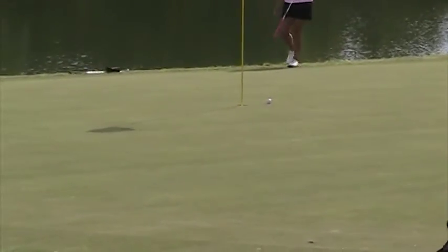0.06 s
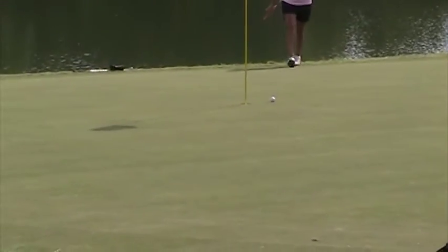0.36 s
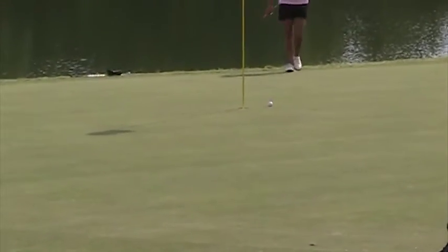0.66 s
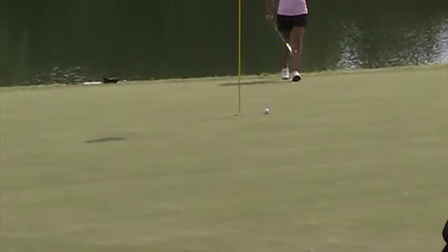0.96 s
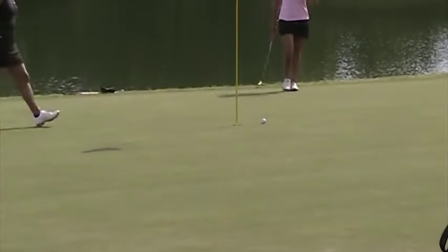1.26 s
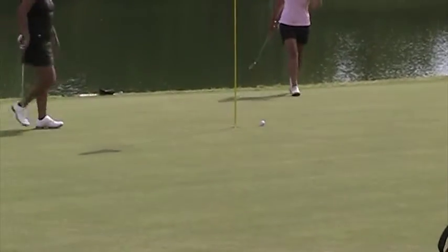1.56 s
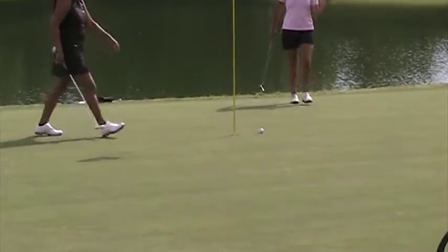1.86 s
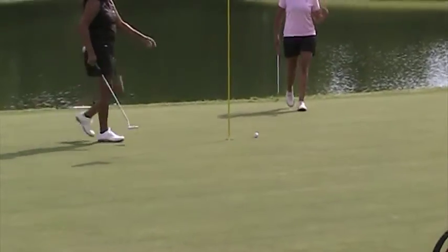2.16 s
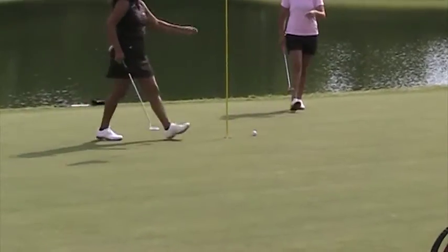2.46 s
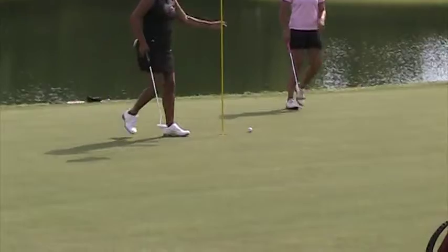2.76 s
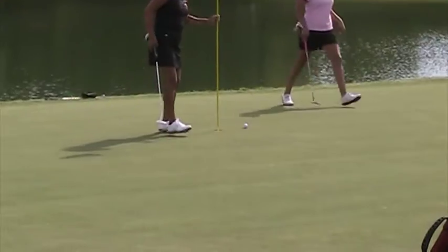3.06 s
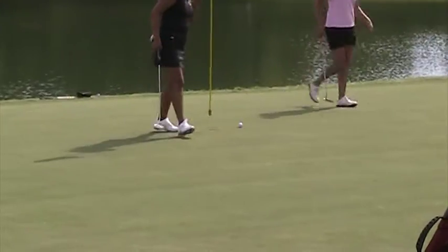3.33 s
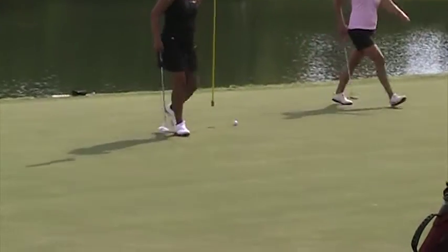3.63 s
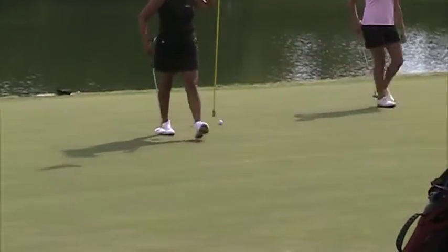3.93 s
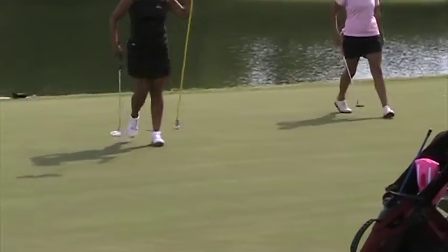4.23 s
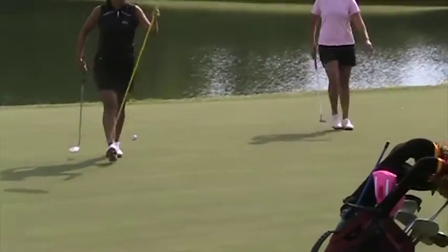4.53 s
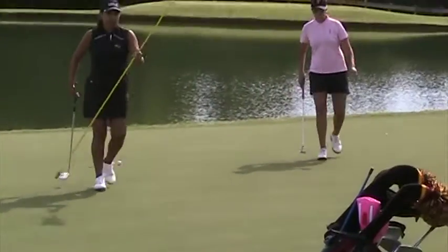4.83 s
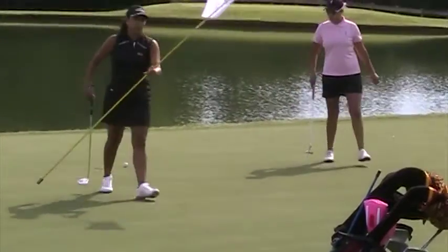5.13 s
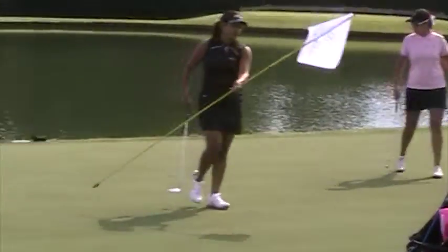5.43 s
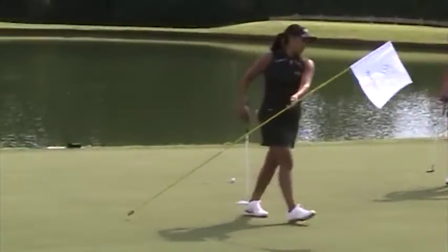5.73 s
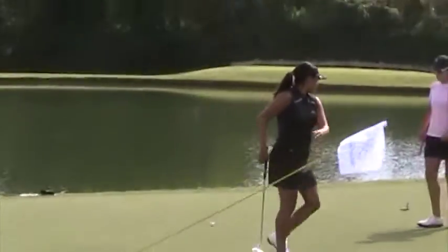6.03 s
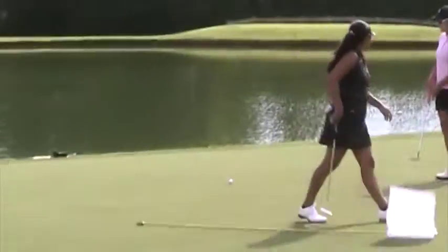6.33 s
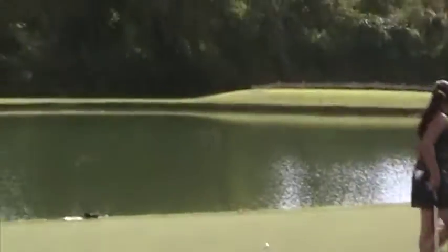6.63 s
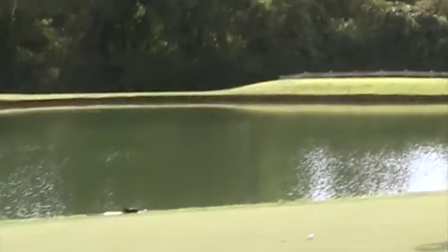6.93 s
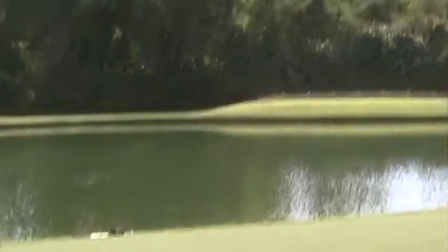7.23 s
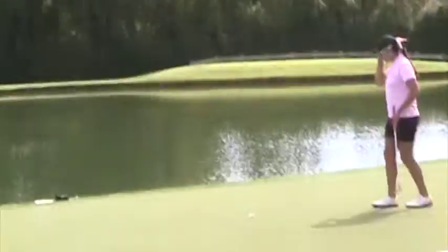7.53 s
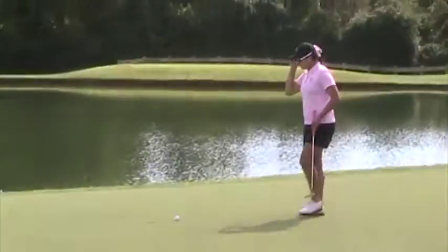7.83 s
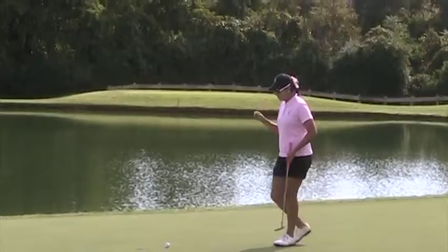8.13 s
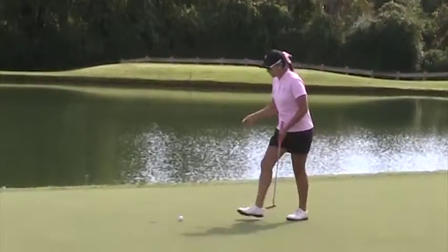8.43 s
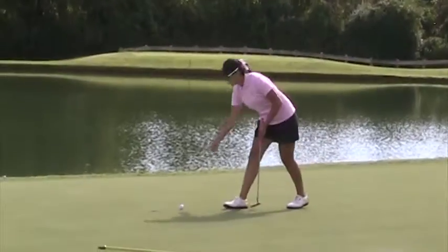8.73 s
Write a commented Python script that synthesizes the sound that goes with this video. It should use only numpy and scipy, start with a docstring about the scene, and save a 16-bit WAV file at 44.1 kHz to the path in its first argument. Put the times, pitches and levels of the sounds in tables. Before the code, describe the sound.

A quiet outdoor background runs throughout: low wind rumble, a distant hum, faint high insect trills and scattered chips and thin whistles from small birds. The end of a hawk's scream is heard right at the start. From about 2.2 seconds the hawk calls steadily, roughly twice a second, until the end. Each scream is short, shrill and arched, hoarse at first and later shorter and purer, with a faint echo from the trees. Soft low wind bumps touch the microphone, mostly around 3.7 and 5.9 seconds. Two faint knocks come near 5.8 seconds. At about 6.3 seconds a dropped flagstick lands close by, slightly left, with a sharp clack and brief rattle, by far the loudest sound, and bounces once at 6.5 seconds among light knocks. Two more small, dry knocks follow around 7.7 and 7.9 seconds as the hawk continues.

```python
"""A hawk repeats its arched scream from the trees by a golf green, over insects and small birds.
Its syrinx doubles its period into side tones and breaks up hoarsely. A dropped flagstick clacks,
rattles and bounces once, among a few light, close knocks. A breeze hums in the distance and now and
then its eddies bump the microphone. The tree line scatters back a faint tail."""
import sys
import numpy as np
from scipy import signal
from scipy.fft import rfft, irfft, next_fast_len
from scipy.io import wavfile
from scipy.ndimage import uniform_filter1d, map_coordinates

SR = 44100
rng = np.random.default_rng(int(sys.argv[2]) if len(sys.argv) > 2 else 0)


def unload_audio(sound):
    """Save the sound as a 16-bit wav file, at the path given as the first command line argument."""
    columns = np.transpose(np.atleast_2d(sound))
    # keep every value between -1 and 1, then stretch to whole-number steps
    steps = np.round(np.clip(columns, -1, 1) * 32767)
    wavfile.write(sys.argv[1], SR, steps.astype(np.int16))


N = 387198


def amp(db):
    return 10 ** (np.asarray(db) / 20)


def unit_rms(x):
    return x / np.sqrt(np.mean(x ** 2) + 1e-20)


def at_hz(points, hz):
    """Interpolate (Hz, value) points on a log axis."""
    knots_hz, values = np.transpose(points)
    return np.interp(np.log(hz + 1), np.log(knots_hz + 1), values)


def timeline(points):
    """Interpolate (s, value) points at every sample."""
    return np.interp(np.arange(N) / SR, *np.transpose(points))


def bell(t, centre, width):
    return np.exp(-((t - centre) / width) ** 2)


def wobble(rate, size=N):
    """Smooth random curve, rate knots per second."""
    knots = rng.standard_normal(int(size * rate / SR) + 4)
    return map_coordinates(knots, [np.arange(size) * rate / SR], mode="nearest")


def filtered(x, response):
    """Apply a gain given as a function of Hz."""
    n = x.shape[-1]
    padded = next_fast_len(n + 4096)
    return irfft(rfft(x, padded) * response(np.fft.rfftfreq(padded, 1 / SR)), padded)[..., :n]


def add(track, start_s, sound):
    i = round(start_s * SR)
    part = sound[max(-i, 0):N - i]
    track[max(i, 0):][:len(part)] += part


def band(centre_hz, octaves, size):
    """Noise of rms 1 in one bell-shaped band."""
    response = lambda f: np.exp(-.5 * (np.log2((f + 1) / centre_hz) / octaves) ** 2)
    return unit_rms(filtered(rng.standard_normal(size), response))


def tinted(x, spectrum):
    """Shape x by (Hz, dB) points, at rms 1."""
    return unit_rms(filtered(x, lambda f: amp(at_hz(spectrum, f))))


def burst(envelope, spectrum):
    """Noise burst, flattened before it takes on a spectrum."""
    n = len(envelope)
    phases = np.angle(rfft(rng.standard_normal(n) * envelope, 2 * n))
    flat = irfft(np.exp(1j * phases))[:n]
    return tinted(flat, spectrum) * np.sqrt(np.mean(envelope ** 2))


def panned(x, pan_db, lag_s):
    """Stereo pair, the left side pan_db louder and lag_s later."""
    sides = np.array([[.5], [-.5]])
    return filtered(x, lambda f: amp(pan_db * sides) * np.exp(-2j * np.pi * f * lag_s * sides))


# Stereo width of the ambience. Each row: frequency in Hz, left-right correlation.
CORRELATION = [(40, -0.62), (80, 0.087), (130, 0.73), (250, 0.15), (500, 0.38), (1000, 0.37), (3000, -0.4),
               (8000, -0.04), (14000, -0.36)]

def rush(spectrum, patchy_db):
    """Stereo noise with patches of random gain; the mid signal has rms 1."""
    cells = signal.stft(rng.standard_normal((2, N)), nperseg=512)[2]
    patches = uniform_filter1d(rng.standard_normal(cells.shape[1:]), size=5, axis=0)
    patches = unit_rms(uniform_filter1d(patches, size=14, axis=1))
    pair = signal.istft(cells * amp(patchy_db * patches), nperseg=512)[1][:, :N]
    angle = lambda f: np.arccos(at_hz(CORRELATION, f)) / 2
    mid, side = filtered(pair, lambda f: amp(at_hz(spectrum, f)) * [np.cos(angle(f)), np.sin(angle(f))])
    return np.array([mid + side, mid - side]) / np.std(mid)


# Decay among the trees. Each row: frequency in Hz, t60 in seconds.
TREE_DECAY = [(150, 0.3), (800, 0.22), (3300, 2.35), (8000, 0.64), (14000, 0.06)]

def tree_echo(x, correlation):
    """The tree line scatters back a long stereo tail."""
    hz, t, cells = signal.stft(rng.standard_normal((2, SR)), SR, nperseg=256)
    envelope = amp(-60 * t / at_hz(TREE_DECAY, hz)[:, None]) * (1 - np.exp(-t / .018))
    tail = signal.istft(cells * envelope, SR, nperseg=256)[1]
    mid, side = signal.fftconvolve(x[None], tail / np.linalg.norm(tail[0]), axes=1)[:, :N]
    angle = np.arccos(correlation) / 2
    return np.cos(angle) * mid + np.sin(angle) * np.array([side, -side])


# Wind rumble and far hum spectra. Each row: frequency in Hz, relative density in dB.
RUMBLE_SPECTRUM = [(12, -13), (20, -7), (38, 7.5), (65, 2), (113, -2.5), (136, -7), (231, -7), (260, -20),
                   (320, -15), (420, -50), (700, -120)]
HUM_SPECTRUM = [(60, -37), (90, -2.5), (120, -1.5), (170, -4), (230, -3.5), (300, -8), (400, -9.5),
                (500, -9.5), (700, -7), (850, -11), (1050, -14), (1400, -16.5), (2200, -24.5), (4000, -40)]
# Their strength over time. Each row: time in seconds, relative level in dB.
RUMBLE_LEVELS = [(0.0, -48), (0.8, -50), (1.15, -50), (2.81, -50.5), (3.25, -55), (3.74, -46), (4.35, -54),
                 (5.45, -54), (5.87, -50), (6.09, -51.5), (6.77, -55.5), (7.39, -55), (8.78, -55.5)]
HUM_LEVELS = [(0.0, -49.5), (3.47, -50), (4.28, -49), (5.26, -50), (6.36, -47.5), (6.5, -45.5),
              (7.65, -50.5), (8.26, -49), (8.78, -50.5)]

def breeze(gust_db=1.4):
    """Wind rumbles in gusts and hums in the distance."""
    rumble_db = timeline(RUMBLE_LEVELS) + .5 + gust_db * wobble(9.9)
    rumble = amp(rumble_db) * rush(RUMBLE_SPECTRUM, patchy_db=1.5)
    hum = amp(timeline(HUM_LEVELS) + 1) * rush(HUM_SPECTRUM, patchy_db=1.03)
    return rumble + hum


def far_swell(peak_s=1.22, width_s=.24, level_db=-57.5):
    """A soft, narrow rush swells once out of the distant hum."""
    return amp(level_db) * bell(np.arange(N) / SR, peak_s, width_s) * band(1100, .22, N)


# Wind eddies. Each row: peak time in seconds, relative level in dB, frequency in Hz.
EDDIES = [(1.365, -38, 58), (1.975, -34.5, 47.7), (2.045, -38, 44.7), (3.148, -36.5, 62),
          (3.625, -29, 55.5), (3.688, -40, 84), (3.768, -28.5, 49.4), (3.821, -36, 45.8), (5.686, -36, 59),
          (5.845, -28, 55), (5.889, -35, 80), (5.924, -28.5, 71), (6.315, -35.5, 112), (8.46, -42, 124)]

def eddy_bumps(width_cycles=.87, gain_db=7.5):
    """Each eddy swings briefly, pushing the two microphone ports mostly in opposite ways."""
    out = np.zeros((2, N))
    for peak_s, db, hz in EDDIES:
        width_s = width_cycles / hz
        reach = int(3 * width_s * SR)
        t = np.arange(-reach, reach) / SR
        phase = 2 * np.pi * hz * np.cumsum(1 + .42 * wobble(89, len(t))) / SR
        for port, offset_rad in zip(out, (0, 2.3)):
            add(port, peak_s + t[0], amp(db + gain_db) * bell(t, 0, width_s) * np.sin(phase + offset_rad))
    return out


def trill(hz, stroke_hz, spread, sharpness, hold_s, fade_db_per_s):
    """Near-regular wing strokes, each a scratchy tone; the level holds, then fades."""
    strokes = np.cumsum(stroke_hz * (1 + .032 * wobble(1.72))) / SR
    tone = np.sin(2 * np.pi * np.cumsum(hz * (1 + spread * wobble(700))) / SR)
    fade = amp(-fade_db_per_s * np.maximum(np.arange(N) / SR - hold_s, 0))
    return fade * unit_rms(tone * np.abs(np.sin(np.pi * strokes)) ** sharpness)


# Far insects and leaves. Each row: frequency in Hz, relative density in dB.
CHORUS_SPECTRUM = [(1200, -16), (2100, 2), (3300, 2), (4500, -1.5), (5500, -2), (6500, 0), (7100, 1.5),
                   (7800, 5.5), (8600, -2), (10000, -10.5), (13000, -19), (15700, -28)]

def insects():
    """Two near trills stand out of a far chorus, then sink back into it."""
    slow = trill(hz=6340, stroke_hz=17.8, spread=.02, sharpness=4.9, hold_s=2, fade_db_per_s=1.5)
    fast = trill(hz=7620, stroke_hz=27, spread=.013, sharpness=2.6, hold_s=6.7, fade_db_per_s=11)
    chorus = amp(-59 + .78 * wobble(1.7)) * rush(CHORUS_SPECTRUM, patchy_db=2.5)
    return amp(-69.5) * slow + amp(-68.5) * fast + chorus


def bird_note(length_s, first_hz, last_hz, waver, bend):
    """A wavering tone that slides fast, then settles."""
    progress = np.linspace(0, 1, int(length_s * SR))
    pitch_hz = last_hz + (first_hz - last_hz) * (1 - progress) ** bend
    pitch_hz *= 1 + waver * wobble(1280, len(progress))
    swell = np.abs(np.sin(np.pi * progress)) ** .5 * amp(1.8 * wobble(65, len(progress)))
    return swell * np.sin(2 * np.pi * np.cumsum(pitch_hz) / SR)


# Chips. Each row: start in seconds, level in dB.
BIRD_CHIPS = [(1.785, -47.5), (2.935, -43.5), (3.359, -48), (4.715, -49), (5.667, -49), (6.56, -47),
              (7.82, -56), (8.565, -56)]
# Whistles. Each row: start and length in seconds, first and last pitch in Hz, level in dB.
BIRD_WHISTLES = [(.91, 0.13, 2560, 2260, -64), (1.075, 0.12, 2090, 2370, -60.5),
                 (1.16, 0.087, 4900, 5020, -66), (1.395, .11, 2580, 2410, -64),
                 (1.525, 0.09, 2100, 2360, -67), (2.1, 0.075, 2470, 2360, -62),
                 (4.73, .14, 9600, 8550, -65), (4.935, .17, 8940, 8150, -54),
                 (5.074, 0.12, 2360, 2380, -66)]

def songbirds():
    """Quick, buzzy rising chips and thin slurred whistles."""
    out = np.zeros(N)
    for start_s, db in BIRD_CHIPS:
        chip = bird_note(length_s=.028, first_hz=4900, last_hz=7600, waver=.055, bend=2.3)
        add(out, start_s, amp(db) * chip)
    for start_s, length_s, first_hz, last_hz, db in BIRD_WHISTLES:
        add(out, start_s, amp(db) * bird_note(length_s, first_hz, last_hz, waver=.0043, bend=3))
    return out


# Knocks, scuffs and the flagstick's settling taps. Each row: start in seconds, level in dB,
# centre in Hz, width in octaves, t60 in seconds, relative tick level in dB.
LIGHT_KNOCKS = [(5.817, -41.5, 2300, .7, .1, -18), (5.869, -47, 2300, .7, .12, -20),
                (6.3745, -24.5, 2000, 1, .02, -12), (6.404, -26, 900, .9, .035, -25),
                (6.463, -38, 2000, .7, .02, -20), (7.145, -54, 1900, 1, .4, -12),
                (7.7353, -34, 2200, .35, .012, -3), (7.8902, -37, 1750, .45, .016, -30)]

def knocks():
    """Short dry knocks, some with a bright tick."""
    out, t = np.zeros(N), np.arange(SR // 3) / SR
    for start_s, db, hz, octaves, t60_s, tick_db in LIGHT_KNOCKS:
        tick = amp(tick_db - 60 * t / .009) * band(11300, .17, len(t))
        body = amp(-60 * t / t60_s) * band(hz, octaves, len(t))
        add(out, start_s, amp(db) * (body + tick))
    return out


def bending_ping(t, arrival_s=.0039, arrival_hz=8800, return_s=.00817):
    """A bending wave runs down the pole, highs first: speed goes as root frequency, pitch as 1 / t^2."""
    sweep = np.sin(2 * np.pi * arrival_hz * arrival_s ** 2 / (t + 1e-5))
    envelope = bell(t, arrival_s, .00025) + .5 * bell(t, .005, .0011) + .52 * bell(t, return_s, .0008)
    return envelope * sweep


# Pole rattle. Each row: frequency in Hz, relative density in dB.
RATTLE_SPECTRUM = [(120, -24), (250, -4), (500, -11), (900, -2.5), (2000, -4), (4000, -8), (5000, -12.5),
                   (8300, -17), (12000, -29), (16000, -33)]

def pole_rattle(t, tap_hz=170, tap_decay_db=18, t60_s=.35):
    """The quivering pole taps at an uneven rate, each tap dying before the next."""
    taps = np.cumsum(tap_hz * np.exp(.5 * wobble(120, len(t)))) / SR
    noise = rng.standard_normal(len(t))
    tap_db = 1.44 * np.clip(wobble(150, len(t)), -1, 1) - tap_decay_db * (taps % 1)
    chatter = tinted(noise * amp(tap_db), RATTLE_SPECTRUM)
    return amp(-60 * t / t60_s) * (1 - np.exp(-t / .0044)) * chatter


# Contact crack. Each row: frequency in Hz, relative density in dB.
CRACK_SPECTRUM = [(60, -35), (130, -5), (300, 2), (500, 3), (800, 1), (1300, -9), (2000, 0.5), (3000, -4),
                  (3900, 0.5), (4900, -15), (6200, -7), (9000, -5), (12500, -16.5), (16000, -27)]
# Low pole modes. Each row: frequency in Hz, relative level in dB, t60 in seconds.
POLE_MODES = [(183, -7.5, 0.034), (285, -1, 0.028), (487, 0, 0.02), (723, 2, 0.019)]
# Fall and bounce. Each row: start in seconds, level in dB, relative thud, ping and rattle levels in dB.
POLE_BLOWS = [(6.3425, -6, -7.5, -2.5, -20), (6.5245, -19, 4, 2.5, -19)]

def flagstick(lead_s=.00192, smack_hz=1900):
    """A soft first touch thuds in the low modes; the hard contact cracks, smacks, pings and rattles."""
    out, t = np.zeros(N), np.arange(SR // 2) / SR
    decay = lambda t60_s: amp(-60 * t / t60_s)
    modes = sum(amp(db) * decay(t60_s) * np.sin(2 * np.pi * hz * t) for hz, db, t60_s in POLE_MODES)
    thud = modes * (1 - np.exp(-t / .0027))
    smack = amp(6) * decay(.0021) * np.sin(2 * np.pi * smack_hz * t)
    for start_s, db, thud_db, ping_db, rattle_db in POLE_BLOWS:
        crack = burst(decay(.0072) + .19 * decay(.052), CRACK_SPECTRUM)
        shaft = amp(ping_db) * bending_ping(t) + amp(rattle_db) * pole_rattle(t)
        add(out, start_s - lead_s, amp(db + thud_db) * thud)
        add(out, start_s, amp(db) * (crack + smack + shaft))
    return out


# Hawk throat response. Each row: frequency in Hz, relative gain in dB.
THROAT_RESPONSE = [(800, -80), (1700, -6), (2500, -2), (3350, 9.5), (4200, 5), (5100, -3), (6000, -21),
                   (6800, 3), (7600, -21), (8500, -17), (10000, -24)]

def syrinx_partials(pitch_hz, phase, split, unsteady, side_db, overtone_db, slip_rad=.12):
    """Period doubling: overtones and half-pitch multiples give way as quarters and eighths grow in."""
    n = len(phase)
    out = np.zeros(n)
    for multiple in np.r_[4:8, 9:25] / 8:
        if multiple % 1 == 0:
            gain = (2 - split) * amp(overtone_db)
        elif multiple % .5 == 0:
            gain = (2 - split) * amp(side_db - 1.5)
        elif multiple % .25 == 0:
            gain = split * amp(side_db)
        else:
            gain = split * amp(-9 + .18 * side_db - 52 * abs(np.log2(multiple)))
        throat_db = at_hz(THROAT_RESPONSE, multiple * pitch_hz)
        gain *= amp(throat_db + 3.5 * wobble(25.7, n) - 2 * unsteady - 6.5)
        out += gain * np.sin(multiple * phase + rng.uniform(0, 2 * np.pi) + slip_rad * wobble(250, n))
    return out


# Hoarse bands. Each row: multiple of the pitch, relative level in dB.
RASP_BANDS = [(1, -3), (1.4, -7.5), (1.95, -11)]

def syrinx_rasp(phase, unsteady, gain_db=-4.5):
    """Chaotic beating smears the strongest partials into bands that follow the pitch."""
    n = len(phase)
    out = np.zeros(n)
    sputter_db = 2 * wobble(178, n)
    for multiple, db in RASP_BANDS:
        beating = wobble(800, n) * np.sin(multiple * phase) + wobble(800, n) * np.cos(multiple * phase)
        out += amp(gain_db + db + sputter_db) * (unsteady + .17) * beating
    return out


# Trend toward purer, further-sagging screams. Each row: time in seconds, relative side-tone level
# in dB, closing fall as a share of the pitch.
SCREAM_TREND = [(0, -6.5, 0.12), (2.2, -9.5, .10), (2.8, -9.5, 0.15), (3.3, -6.5, 0.094), (3.9, -6.5, 0.14),
                (4.8, -11.5, .16), (5.8, -16.5, 0.0944), (7, -18, .24), (8.4, -16, 0.13)]
# Screams. Each row: start and length in seconds, crest time as a share of the length,
# crest pitch in Hz, relative scream and overtone levels in dB.
SCREAMS = [(-.14, 0.37, 0.37, 3370, -51.5, -9), (2.239, 0.44, 0.55, 3358, -44.5, -13.5),
           (2.84, 0.35, 0.4, 3330, -49.5, -12), (3.32, 0.35, 0.39, 3393, -48.5, -16),
           (3.841, 0.31, 0.22, 3466, -47.5, -24), (4.294, 0.24, 0.39, 3406, -49, -19),
           (4.756, 0.26, 0.38, 3394, -49, -24), (5.178, 0.26, 0.36, 3290, -49.5, -25),
           (5.623, 0.24, 0.39, 3315, -45.5, -22), (6.124, 0.26, 0.35, 3394, -45.5, -29),
           (6.602, .235, 0.25, 3315, -49, -20), (7.022, .22, 0.24, 3294, -48.5, -20),
           (7.538, 0.24, 0.38, 3270, -47.5, -6), (7.973, 0.25, 0.38, 3360, -44.5, -27),
           (8.367, 0.26, 0.3, 3300, -46.5, -25)]

def hawk(scoop=.28, arch=.059, crack_at_s=2.94, crack_drop=.075, flutter_db=3, push_db=4):
    """Each scream scoops up, arches and sags in pitch; the voice cracks once in the series."""
    out = np.zeros(N)
    trend_s, trend_db, trend_fall = np.transpose(SCREAM_TREND)
    for start_s, length_s, crest_share, crest_hz, db, overtone_db in SCREAMS:
        side_db, fall = np.interp(start_s, trend_s, trend_db), np.interp(start_s, trend_s, trend_fall)
        n, crest_s = int(length_s * SR), crest_share * length_s
        t = np.arange(n) / SR
        left_s = length_s - t
        crack = bell(start_s + t, crack_at_s, .0175)
        # Unsteady at the onset, at the crack and as the pressure runs out.
        unsteady = np.exp(-t / .032) + crack + 1 / (1 + np.exp((left_s - .06) / .015))
        onset_dip = scoop * np.exp(-t / .012) + arch * np.clip(1 - t / min(crest_s, .1), 0, 1) ** 2
        sag = fall * np.clip((t - crest_s) / (length_s - crest_s), 0, 1) ** 1.7
        jitter = .0043 * wobble(198.5, n) + .004 * wobble(35.3, n) + .031 * unsteady * wobble(900, n)
        pitch_hz = crest_hz * (1 - onset_dip - sag - crack_drop * crack) * (1 + jitter)
        phase = 2 * np.pi * np.cumsum(pitch_hz) / SR
        split = np.clip(t / (.36 * length_s), 0, 1) ** 2
        voice = np.sin(phase) * amp(flutter_db * wobble(67.8, n) - 3.8 * unsteady)
        voice += syrinx_partials(pitch_hz, phase, split, unsteady, side_db, overtone_db)
        voice += syrinx_rasp(phase, unsteady)
        push = amp(push_db * (bell(t, crest_s + .096 * length_s, .17) - 1))  # peaks after the crest
        gate = (1 - np.exp(-t / .026)) * (1 - np.exp(-left_s / .02))
        add(out, start_s, amp(db + 3) * push * gate * voice)
    return out


def scene():
    """Birds and pole slightly left, with their tree echoes, over insects and wind."""
    screams, notes, hits = hawk(), songbirds(), flagstick() + knocks()
    birds = panned(screams + notes, pan_db=1, lag_s=18e-6)
    close_hits = panned(hits, pan_db=1.6, lag_s=8e-6)
    echoes = amp(-18) * tree_echo(screams, correlation=.5)
    echoes += amp(-10) * tree_echo(notes, correlation=.5)
    echoes += amp(-21) * tree_echo(hits, correlation=.77)
    background = insects() + breeze() + eddy_bumps() + far_swell()
    return background + echoes + close_hits + birds


def record(dry, top_hz=15750):
    """Hard limit at full scale, then a brick-wall low-pass."""
    return filtered(np.clip(dry, -1, 1), lambda f: f < top_hz)


dry = scene()
out = record(dry)
unload_audio(out)
```